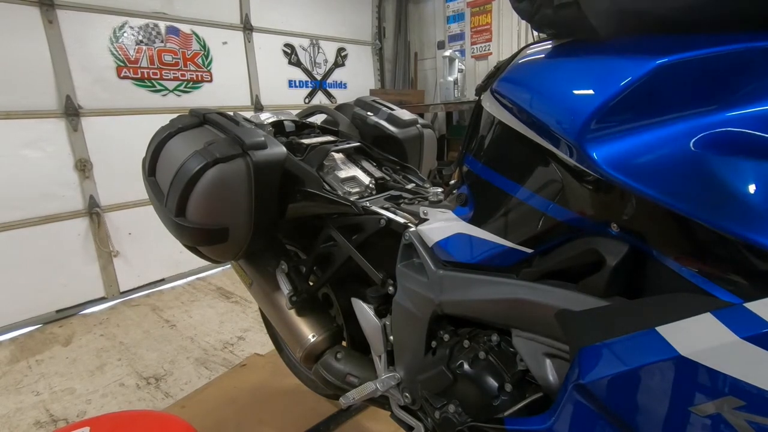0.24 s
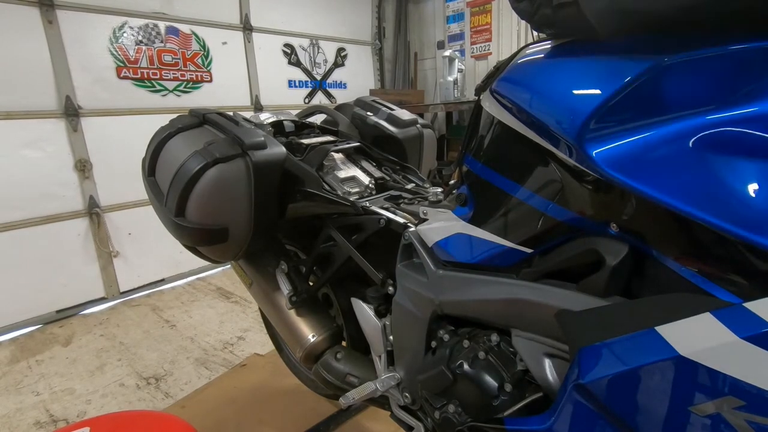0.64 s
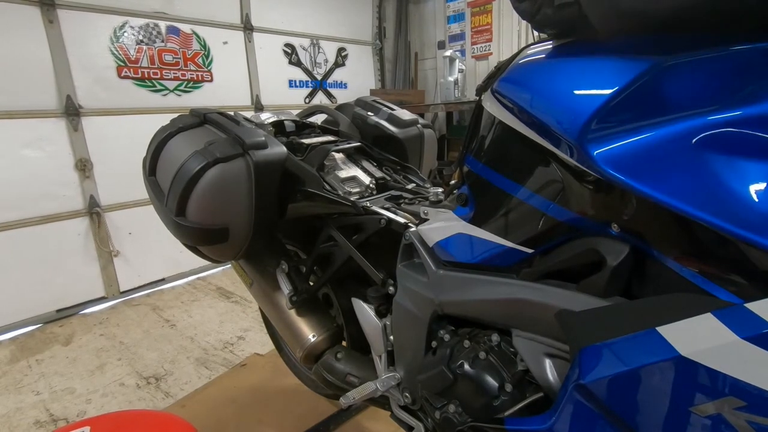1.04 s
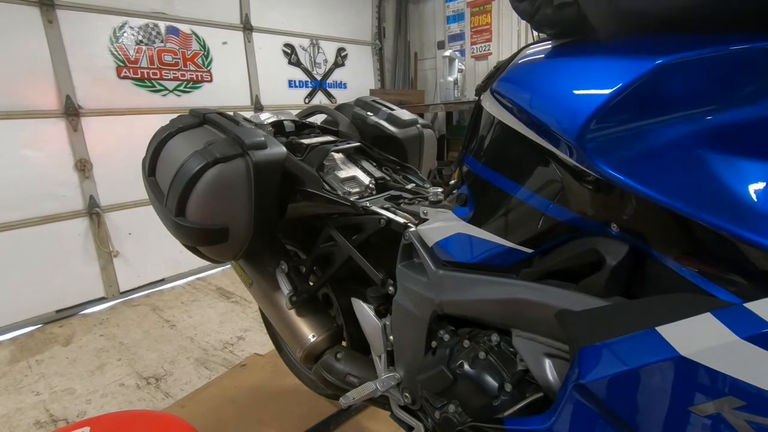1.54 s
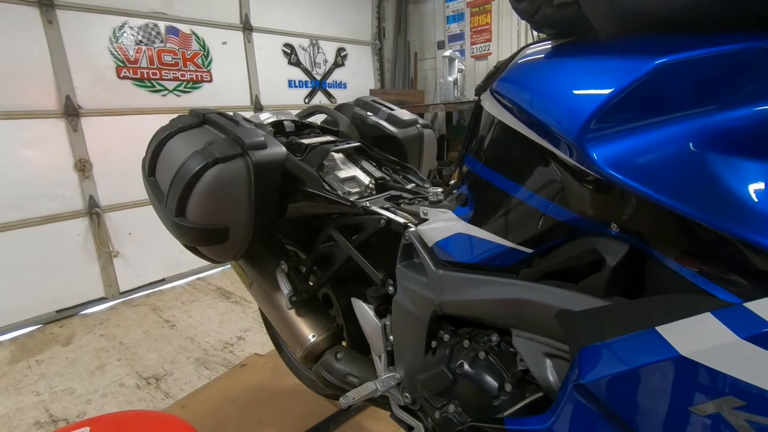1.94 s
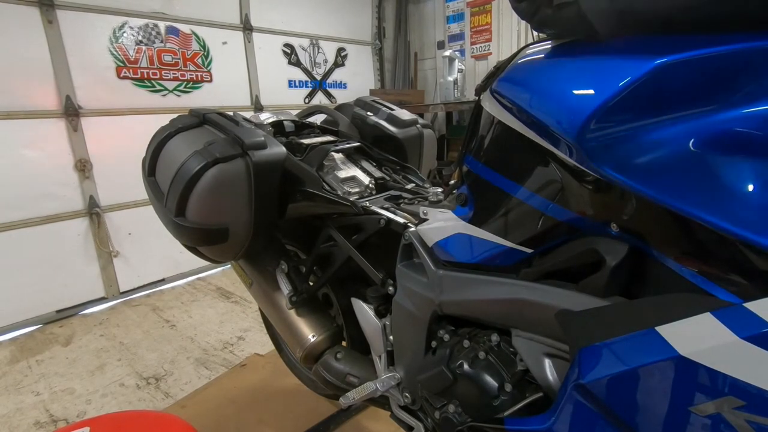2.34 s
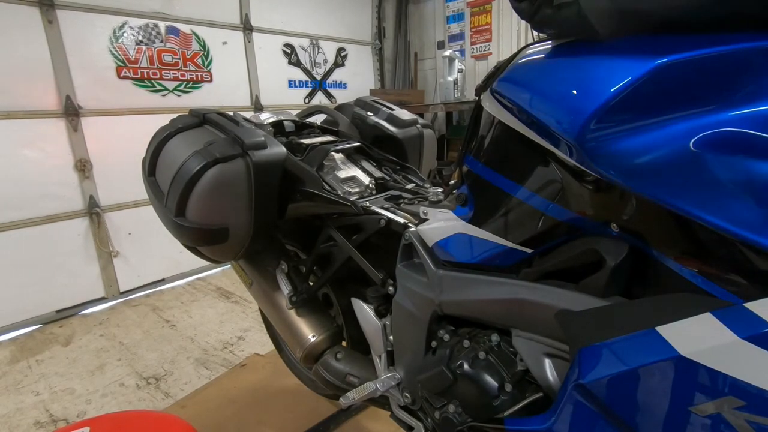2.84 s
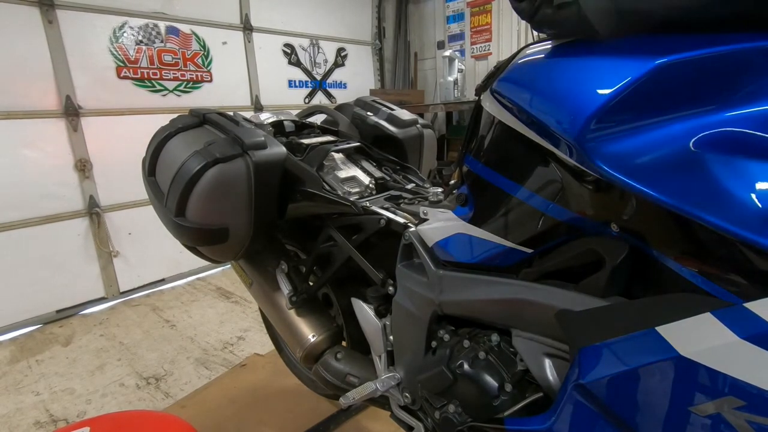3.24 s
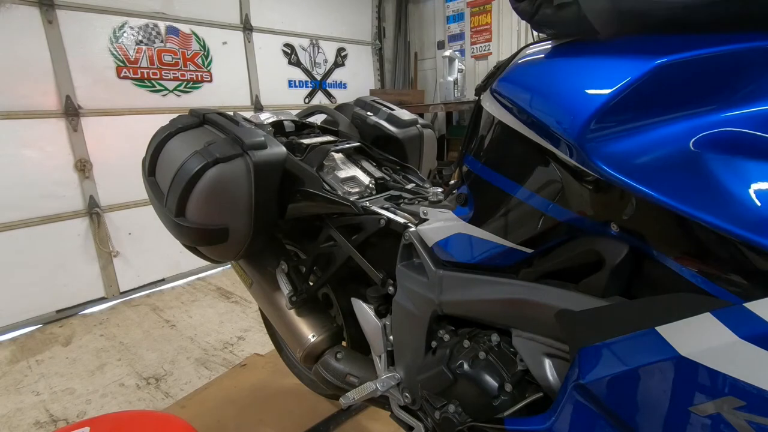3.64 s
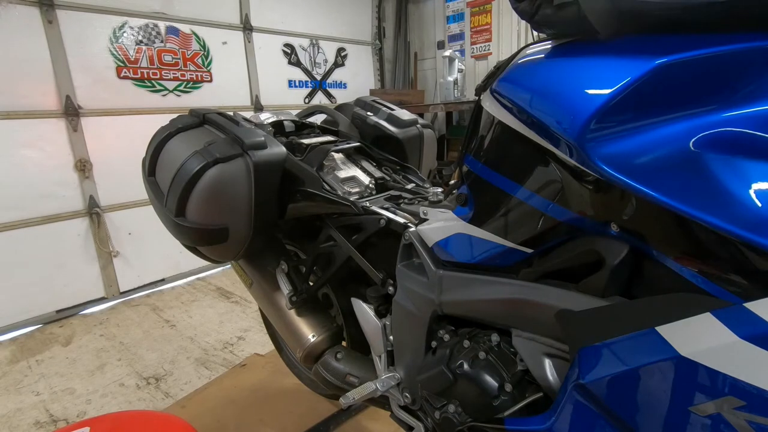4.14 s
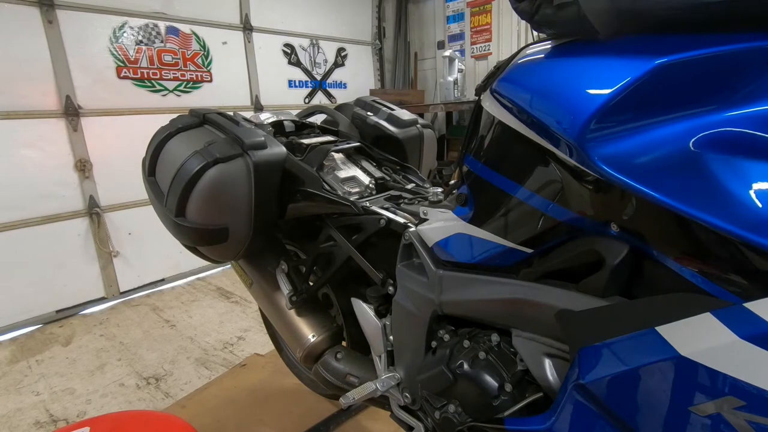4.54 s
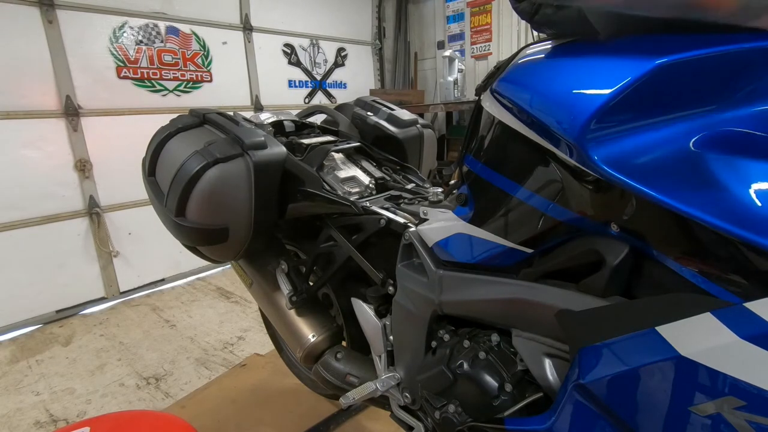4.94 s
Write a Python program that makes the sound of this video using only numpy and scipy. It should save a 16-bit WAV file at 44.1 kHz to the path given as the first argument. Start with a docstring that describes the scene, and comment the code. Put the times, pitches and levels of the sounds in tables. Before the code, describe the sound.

Over a faint hum in a garage, a motorcycle's key clicks on. Something rustles softly, and a small servo whirrs twice, ending with a metallic tick. After another click, the starter grinds in five quick pulses with dull exhaust puffs. The engine catches loudly with a few bangs, flares, sags and settles into a fast idle with valve clatter and gear whine, all close to the microphone.

```python
"""Motorcycle starting in a garage

Close to a four-cylinder sports bike, in near-mono stereo, with a faint hum in the room behind it.
The key clicks, something rustles, and a small geared servo whirrs out and back against its stop.
The starter's gears grind through five compressions, each puffing air from the pipe. The engine catches
with a few bangs, flares, sags, and settles at a fast idle with valve clatter and gear whine."""
import sys
import numpy as np
from scipy import signal
from scipy.fft import rfft, irfft, next_fast_len
from scipy.io import wavfile
from scipy.ndimage import map_coordinates

SR = 44100
rng = np.random.default_rng(int(sys.argv[2]) if len(sys.argv) > 2 else 0)


def waveform_to_disk(signal):
    """Save audio, clipped to [-1, 1], as 16-bit WAV at the path in sys.argv[1]."""
    frames = np.transpose(np.atleast_2d(signal))
    scaled = np.clip(frames, -1, 1) * 32767
    samples = np.round(scaled).astype(np.int16)
    wavfile.write(sys.argv[1], SR, samples)


N = 228471
T = np.arange(N) / SR
STARTER_ON_S, CATCH_S = 3.482, 4.223   # the starter engages; the engine first fires

# gas rushing from the tailpipe: frequency_hz, level_db
PIPE_SPECTRUM = [(5, -60), (22, -19), (45, 3), (75, 5.5), (230, -4), (330, -1), (440, -0.5), (540, -19.5),
                 (900, -35), (4000, -75)]


def from_db(db):
    """Decibels to gain."""
    return np.exp(np.asarray(db) * (np.log(10) / 20))


def rms_one(x):
    """Scale to unit power."""
    return x / np.sqrt(np.mean(x ** 2) + 1e-20)


def in_time(rows):
    """Turn rows of (time_s, values...) into one curve per value, at every sample."""
    times, *columns = np.transpose(rows)
    return [np.interp(T, times, column) for column in columns]


def since(start_s):
    """Seconds gone by after a moment; zero before it."""
    return np.maximum(T - start_s, 0)


def gate(start_s, end_s, rise_s, fall_s):
    """Linear rise, hold, exponential fall."""
    return np.clip((T - start_s) / rise_s, 0, 1) * np.exp(-since(end_s) / fall_s)


def drift(rate):
    """Smooth random wander of spread 1, up to about `rate` swings a second."""
    coarse = T[::32]
    slow = map_coordinates(rng.standard_normal(8192), [coarse * rate * 2], order=2, mode="wrap")
    return np.interp(T, coarse, rms_one(slow))


def ticks(turns):
    """One unit click for each whole turn."""
    return np.diff(np.floor(turns), prepend=np.floor(turns[0]))


def at_hz(points, hz):
    """Read a table on a log-frequency axis."""
    frequencies, values = np.transpose(points)
    return np.interp(np.log(hz + 1e-9), np.log(frequencies), values)


def shaped(x, spectrum, tilt_db=0):
    """Filter by rows of (frequency_hz, gain_db), tilted by tilt_db per octave."""
    size = next_fast_len(len(x) + SR // 8)
    hz = np.arange(size // 2 + 1) * SR / size
    gain = from_db(at_hz(spectrum, hz) + tilt_db * np.log2(hz + 1))
    return irfft(rfft(x, size) * gain, size)[:len(x)]


def noise(spectrum, tilt_db=0, samples=N):
    """Coloured noise of unit power."""
    return rms_one(shaped(rng.standard_normal(samples), spectrum, tilt_db))


def ring(x, hz, t60_s):
    """A unit click sets a sine of height 1 ringing."""
    radius, angle = from_db(-60 / (t60_s * SR)), 2 * np.pi * hz / SR
    return signal.lfilter([0, np.sin(angle)], [1, -2 * radius * np.cos(angle), radius ** 2], x + 1e-18)


def peak(x, hz, width_hz):
    """One resonance, gain 1 on top."""
    return signal.lfilter(*signal.iirpeak(hz, hz / width_hz, SR), x)


def resonant(x, modes):
    """A body adds its resonances to whatever shakes it; unit power."""
    return rms_one(x + sum(from_db(db) * peak(x, hz, width_hz) for hz, width_hz, db in modes))


def scattered(x, decay_s):
    """Spread a signal over many close, short echoes; power is kept."""
    t = T[:SR // 5]
    echoes = rng.standard_normal(len(t)) * np.exp(-t / decay_s)
    return signal.fftconvolve(x, echoes / np.linalg.norm(echoes))[:N]


def garage(x, wet_db):
    """The microphone hears the direct sound, then a diffuse tail that lasts longest in the bass."""
    # reverberation time: frequency_hz, t60_s
    decay_times = [(100, 0.6), (1000, 0.24), (4000, 0.48), (8000, 0.3), (16000, 0.29)]
    t, tail = T[:SR // 2], 0
    edges_hz = np.geomspace(60, 16000, 8)
    for low, high in zip(edges_hz, edges_hz[1:]):
        bandpass = signal.butter(2, [low, high], "band", fs=SR, output="sos")
        band = signal.sosfilt(bandpass, rng.standard_normal(len(t)))
        tail += band * from_db(-60 * t / at_hz(decay_times, np.sqrt(low * high)))
    tail *= t > .004   # the first reflection comes 4 ms late
    return x + from_db(wet_db) * signal.fftconvolve(x, tail / np.linalg.norm(tail))[:N]


def hum(waver_db=0.2):
    """A motor hums somewhere in the background, wavering slightly."""
    # steady tones: pitch_hz, level_db
    tones = [(58.2, -46.5), (116.2, -59.5), (174.3, -56.5), (236, -68.5), (291.5, -66.5), (1001, -71)]
    out = 0
    for hz, db in tones:
        amplitude = np.sqrt(2) * from_db(db + waver_db * drift(3.36))
        out += amplitude * np.sin(2 * np.pi * hz * T + 0.13 * drift(1.88))
    return out


def room_tone(hiss_db=-57.5, rumble_db=-38):
    """The air in the garage hisses and rumbles."""
    # faint hiss: frequency_hz, level_db
    hiss_spectrum = [(120, -45), (220, -3), (300, -7.5), (490, -8), (1000, -11.5), (1550, -18.5),
                     (3300, -24), (4300, -28.5), (4750, -26.5), (5400, -33.5), (10000, -37), (15500, -39.5)]
    # deep rumble: frequency_hz, level_db
    rumble_spectrum = [(1, -44), (4, -15), (8, 12), (14, -7.5), (25, -38), (45, -29), (80, -26.5),
                       (120, -27), (220, -32.5), (400, -63), (1500, -72)]
    return from_db(hiss_db) * noise(hiss_spectrum) + from_db(rumble_db) * noise(rumble_spectrum)


def clicks(ring_t60_s=0.024, rise_s=0.0018, hold_s=0.003):
    """Each contact is a short crack that also sets its own small part ringing."""
    # switches and stops: start_s, level_db, tilt_db_per_octave, t60_s, ring_hz, ring_db
    contacts = [(1.088, -56.5, 0.5, 0.37, 4120, -10), (1.121, -35.5, 9.5, 0.043, 3960, -3.5),
                (1.13, -34.5, -3.5, 0.02, 1860, -3.5), (1.170, -30, 5.5, 0.033, 4220, -11),
                (1.727, -45, 1.5, 0.073, 4520, -2.5), (1.892, -37.5, -0.5, 0.19, 2200, -18),
                (1.941, -40.5, -1, 0.046, 4220, -18), (2.348, -39, 1, 0.081, 4450, -10),
                (2.694, -38, -0.5, 0.096, 1756, -5), (2.702, -43, -6.5, 0.027, 4280, 6.5),
                (3.380, -38.5, -5, 0.019, 1615, -5), (3.483, -27, -5.5, 0.17, 664, -3)]
    # the crack before its tilt: frequency_hz, level_db
    crack_spectrum = [(200, -22), (500, -9.5), (1000, 1), (1900, 4), (3000, 1), (4200, 2), (5300, -6),
                      (6600, -13.5), (8800, -8), (12000, -20.5), (16000, -32)]
    out, t = np.zeros(N), T[:SR // 4]
    for start_s, db, tilt_db, t60_s, ring_hz, ring_db in contacts:
        envelope = np.minimum(t / rise_s, 1) * from_db(-60 * np.maximum(t - hold_s, 0) / t60_s)
        crack = from_db(db) * envelope * noise(crack_spectrum, tilt_db, len(t))
        ringing = from_db(ring_db) * np.std(crack) * rms_one(ring(crack, ring_hz, ring_t60_s))
        at = round(start_s * SR)
        out[at:at + len(t)] += crack + ringing
    return out


def rustle(level_db=-53.5):
    """Something rustles in one soft swell."""
    # dull rustle: frequency_hz, level_db
    spectrum = [(120, -15), (250, 4.5), (800, 5), (1450, -0.5), (2200, -15), (6000, -30), (16000, -47)]
    swell = gate(start_s=1.33, end_s=1.93, rise_s=.22, fall_s=0.09)
    return swell * from_db(level_db + drift(29.9)) * noise(spectrum)


def servo(pulse_db=3.5, buzz_db=-2, segments=6):
    """A small geared motor whirrs, pulsing with each turn and slowing under load on its way back."""
    # out and back: start_s, end_s, level_db, first_turns_per_s, last_turns_per_s
    runs = [(1.732, 1.956, -53, 80, 94), (2.357, 2.702, -53.5, 76, 52)]
    # housing resonances: pitch_hz, width_hz, gain_db
    housing_modes = [(2570, 290, -2), (4630, 370, -4), (6200, 400, 4.5), (7650, 500, 0), (9600, 400, -4),
                     (11100, 600, -3), (13400, 250, 7)]
    # colour of the whirr: frequency_hz, gain_db
    colour = [(410, -47), (700, -22), (818, 5.5), (1210, -2), (1450, 1), (2530, -0.5), (3360, -4),
              (4520, -2.5), (5500, -16), (7600, -6), (15500, -28.5)]
    out = 0
    for start_s, end_s, db, first_rate, last_rate in runs:
        turns = np.cumsum(np.interp(T, [start_s, end_s], [first_rate, last_rate])) / SR
        brushes = from_db(buzz_db) * rms_one(ticks(segments * turns)) + rng.standard_normal(N)
        whirr = rms_one(shaped(resonant(brushes, housing_modes), colour))
        pulsing = from_db(db + pulse_db * np.cos(2 * np.pi * turns))
        out += gate(start_s, end_s, rise_s=0.007, fall_s=0.019) * pulsing * whirr
    return out


def end_stop(start_s=2.695, blow_db=-35.5):
    """One metallic blow as the servo runs home against its stop."""
    # the ringing stop: pitch_hz, gain_db, t60_s
    modes = [(830, -15, 0.38), (1180, -10, 0.094), (1760, 0, 0.049), (2207, -9, 0.21), (3095, -21, 0.13),
             (4188, -14, 0.14), (4576, -18, 0.11)]
    blow = np.zeros(N)
    blow[round(start_s * SR)] = from_db(blow_db)
    return sum(from_db(db) * ring(blow, hz, t60_s) for hz, db, t60_s in modes)


def starter_motor_gain(base_db=-27.5, sag_db_per_s=5, inrush_s=0.034, overrun_s=0.053):
    """The motor's loudness: it jolts on, tires slowly, surges as the engine catches and dies away."""
    inrush_db = 3.5 * np.exp(-since(STARTER_ON_S) / inrush_s)
    overrun_db = 12 * np.exp(-np.maximum(CATCH_S - T, 0) / overrun_s)
    db = base_db - sag_db_per_s * since(STARTER_ON_S) + inrush_db + overrun_db
    return from_db(db) * gate(STARTER_ON_S, CATCH_S, rise_s=0.0081, fall_s=0.043)


def gear_mesh(mesh_hz, grind_db, jitter=.085, spread_s=0.001594):
    """Teeth strike in turn; the harder they grind, the more uneven and noisy they are."""
    grind = from_db(grind_db)
    teeth_passed = np.cumsum(mesh_hz * (1 + jitter * grind * drift(350))) / SR
    blows = ticks(teeth_passed) * from_db(2 * grind * rng.standard_normal(N))
    # each blow disperses on its way through the metal: the highs arrive first
    hz = np.arange(N // 2 + 1) * SR / N
    lag_s = spread_s * np.exp(-hz / 5000)
    phase = 2 * np.pi * np.cumsum(lag_s) * SR / N
    dispersed = irfft(rfft(blows - blows.mean()) * np.exp(-1j * phase), N)
    return (rms_one(dispersed) + grind * rng.standard_normal(N)) / np.sqrt(1 + grind ** 2)


def starter(free_hz=590, chatter_db=3.0, level_db=-23):
    """Each compression loads the gears: they get loud and their pitch is dragged down."""
    # load strokes: start_s, length_s, relative_db, first_mesh_hz, last_mesh_hz, grind_db
    strokes = [(3.534, .047, -24.5, 700.2, 680, -14.5), (3.624, .073, -19, 1060, 720, -3.5),
               (3.793, .033, -14.5, 850, 768, -5), (3.906, .046, -16.5, 1023, 574, -2.5),
               (4.018, .042, -16.5, 1072, 620, -2.5), (4.131, .044, -16.5, 1100, 650, -2.5)]
    # crankcase resonances: pitch_hz, width_hz, gain_db
    case_modes = [(635, 32, 5.5), (833, 51, 3.5), (1187, 27, 4), (1520, 39, -5.5), (2010, 71, -3.5),
                  (2264, 63, 1.5), (2750, 105, -4)]
    # colour of the grinding: frequency_hz, gain_db
    colour = [(120, -21), (250, -7.5), (480, -9.5), (640, -8), (1000, -4), (1600, -1), (2500, -5),
              (3900, -6.5), (4600, -16), (5700, -24.5), (6900, -18), (8300, -29), (11000, -35),
              (15500, -51)]
    load, mesh_path = 0, []
    for start_s, length_s, db, first_hz, last_hz, grind_db in strokes:
        end_s = start_s + length_s
        load += from_db(db) * gate(start_s, end_s, rise_s=0.0076, fall_s=0.012)
        mesh_path += [(start_s, first_hz, grind_db),
                      (start_s + length_s / 2, np.sqrt(first_hz * last_hz), grind_db),
                      (end_s, last_hz, grind_db),
                      (end_s + .03, free_hz, grind_db)]
    loaded = load * gear_mesh(*in_time(mesh_path)) * from_db(chatter_db * drift(130))
    free = starter_motor_gain() * gear_mesh(free_hz * (1 + .02 * drift(10)), grind_db=1)
    gears = shaped(resonant(loaded + free, case_modes), colour)
    cranking = (T > strokes[0][0]) & (T < CATCH_S)
    return from_db(level_db) * gears / np.std(gears[cranking])


def puffs(gain_db=-8, hold_s=0.023):
    """While the engine is cranked, a dull puff from the pipe comes with each compression."""
    # air pumped out: start_s, relative_db
    compressions = [(3.691, -24), (3.791, -28.5), (3.914, -27), (4.02, -26.5), (4.145, -23.5)]
    flow = sum(from_db(db + gain_db) * gate(start_s, start_s + hold_s, rise_s=0.0048, fall_s=0.067)
               for start_s, db in compressions)
    return flow * noise(PIPE_SPECTRUM, tilt_db=-3.5)


def driven(idle_db, slope, idle_effort_db=-15):
    """Gain of one part of the engine's sound: it rises `slope` dB for each dB of effort over idle."""
    # strength of combustion: time_s, effort_db
    effort = [(4.23, -12), (4.27, -4.5), (4.31, -15.5), (4.388, -11), (4.604, -23), (4.83, -16),
              (5.16, -13)]
    return from_db(idle_db + slope * (in_time(effort)[0] - idle_effort_db))


def exhaust(turns, uneven_db=2.5, gas_db=-10, settle_s=0.067, misfire_db=23, ragged_db=8.5):
    """Two firings a turn; unequal cylinders add the odd and half orders, which the silencer colours."""
    # exhaust overtones: multiple_of_crank_speed, relative_db
    orders = [(1.5, -9), (2.5, -8), (3, -1), (3.5, -16), (4, 2.5), (4.5, -12.5), (5, 0), (5.5, -12),
              (6, -4.5), (6.5, -28), (7, -8.5), (7.5, -30), (8, -5), (8.5, -38), (9, -8.5), (9.5, -33),
              (10, -52)]
    # silencer resonances: pitch_hz, width_hz, gain_db
    silencer_modes = [(255, 12, -2.5), (284, 5.1, 5), (352.5, 10, 11.5), (435.3, 22, 3.5)]
    # what the silencer lets through: frequency_hz, gain_db
    silencer_loss = [(50, -0.5), (380, -3.5), (440, -3), (470, -8), (540, -2), (700, -32)]
    angle = 2 * np.pi * turns
    overtones = sum(from_db(db + drift(6)) * np.cos(order * angle + rng.normal()) for order, db in orders)
    overtones *= from_db(uneven_db * drift(50))   # no two charges burn alike
    overtones = shaped(resonant(overtones, silencer_modes), silencer_loss)
    overtones /= np.std(overtones[T > CATCH_S])
    crank_tone = driven(idle_db=-26.5, slope=1.8) * np.cos(0.99 * angle)
    firing_tone = driven(idle_db=-18, slope=1.1) * np.cos(2 * angle)
    # combustion is ragged at first: less throb and more gas noise until it evens out
    ragged = np.exp(-since(CATCH_S) / settle_s)
    throb = from_db(-misfire_db * ragged) * np.sqrt(2) * (crank_tone + firing_tone)
    gas = from_db(gas_db + ragged_db * ragged) * noise(PIPE_SPECTRUM, tilt_db=-0.5)
    return throb + driven(idle_db=-19.5, slope=.8) * (overtones + gas)


def bangs(band_hz=(55, 520)):
    """The first charges explode in the pipe and ring its resonances."""
    # first firings: start_s, relative_db
    firings = [(4.2256, -6.5), (4.247, -3), (4.2662, -10), (4.279, -9), (4.34, -8.5)]
    # pipe resonances: pitch_hz, gain_db, t60_s
    pipe_modes = [(64, -2, 0.18), (114.2, 2.5, 0.13), (217.8, 1.5, 0.068), (300, -8, 0.098),
                  (349, -10.5, 0.14), (425, -3.5, 0.027)]
    kicks = np.zeros(N)
    for start_s, db in firings:
        kicks[round(start_s * SR)] = -from_db(db)
    ringing = sum(from_db(db) * ring(kicks, hz, t60_s) for hz, db, t60_s in pipe_modes)
    return signal.sosfilt(signal.butter(2, band_hz, "band", fs=SR, output="sos"), ringing)


def clatter(turns, knock_db=-1, pulse_db=1.5, knock_s=0.0079):
    """Each cylinder's valves knock with their own ring, a piston slaps, hiss pulses with the firings."""
    # colour of the rattling metal: frequency_hz, gain_db
    colour = [(310, -29), (520, -9.5), (625, -4.5), (721, -10), (831, -6.5), (1270, -4), (1470, 1.5),
              (1890, -3), (2900, -6), (3960, -7), (4320, -10.5), (4770, -14), (6420, -21), (11800, -29.5),
              (15500, -45)]
    blows = [ticks(turns / 2 + cylinder / 4) * from_db(2 * rng.standard_normal(N))
             for cylinder in range(4)]
    valves = sum(scattered(blow, knock_s) for blow in blows)
    piston_slap = scattered(ticks(turns), knock_s)
    hiss = rng.standard_normal(N) * from_db(pulse_db * np.cos(2 * np.pi * 2 * turns))
    rattle = from_db(knock_db) * rms_one(valves + piston_slap) + rms_one(hiss)
    return rms_one(shaped(rattle, colour))


def gear_whine(turns, teeth=88, second_teeth=118, second_db=-11, waver_db=3.0, rasp_rad=0.37):
    """Two gears sing at their tooth rates, swaying once a turn; their level wavers."""
    angle = 2 * np.pi * turns
    sway = np.sin(angle) + rasp_rad * drift(120)
    mesh = np.sin(teeth * angle + sway) + from_db(second_db) * np.sin(second_teeth * angle + sway)
    fade_in = gate(start_s=4.33, end_s=T[-1], rise_s=0.22, fall_s=1)
    return mesh * from_db(waver_db * drift(40)) * fade_in


def engine(whine_db=-8, jolt_db=9, jolt_s=0.033, boom_db=-3):
    """Exhaust, valve clatter and gear whine all follow the crank; the pipe sets the room booming."""
    # the crank flares, sags and settles: time_s, turns_per_s
    crank_speed = [(4.22, 52.7), (4.308, 59.0), (4.386, 55.8), (4.476, 50.8), (4.646, 47.9), (4.74, 50.6),
                   (4.946, 50.3), (5.074, 49.3), (5.17, 49.5)]
    turns = np.cumsum(in_time(crank_speed)[0] * (1 + .0035 * drift(40))) / SR
    running = gate(CATCH_S, T[-1], rise_s=0.0088, fall_s=1)
    jolt = from_db(jolt_db * np.exp(-since(CATCH_S) / jolt_s))   # the first firings rattle the engine
    metal = garage(clatter(turns), wet_db=-8.5) + from_db(whine_db) * gear_whine(turns)
    metal *= running * jolt * driven(idle_db=-26.5, slope=0.23)
    pipe = running * exhaust(turns) + bangs()
    boom = from_db(boom_db) * peak(pipe, hz=117.8, width_hz=2)   # a standing wave of the garage
    return pipe + boom + metal


def scene():
    """The bike stands straight ahead of the microphone; only the top treble differs left to right."""
    # side against mid: frequency_hz, gain_db
    stereo_width = [(100, -62), (3500, -58), (6000, -32), (7200, -15), (15000, 2)]
    switching_on = garage(clicks() + servo() + end_stop(), wet_db=-10)
    cranking = garage(starter(), wet_db=-7.5) + puffs()
    mid = switching_on + cranking + engine() + hum() + rustle() + room_tone()
    side = shaped(mid, stereo_width) * drift(400)
    return np.array([mid + side, mid - side])


def record(dry, ceiling=.95, cutoff_hz=15800):
    """The recorder rounds the loudest peaks and cuts the top treble."""
    rounded = dry / (1 + (dry / ceiling) ** 6) ** (1 / 6)
    return signal.sosfilt(signal.ellip(10, .1, 80, cutoff_hz, fs=SR, output="sos"), rounded)


dry = scene()
out = record(dry)
waveform_to_disk(out)
```